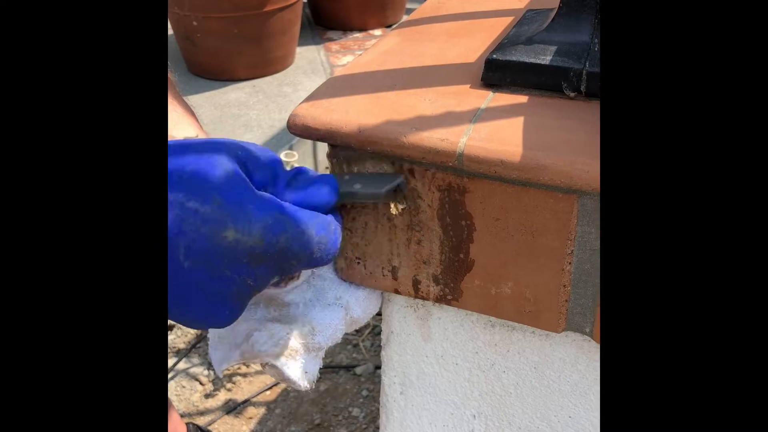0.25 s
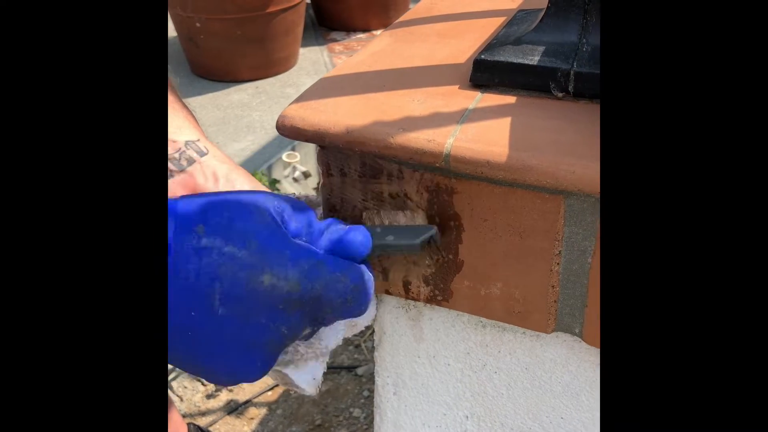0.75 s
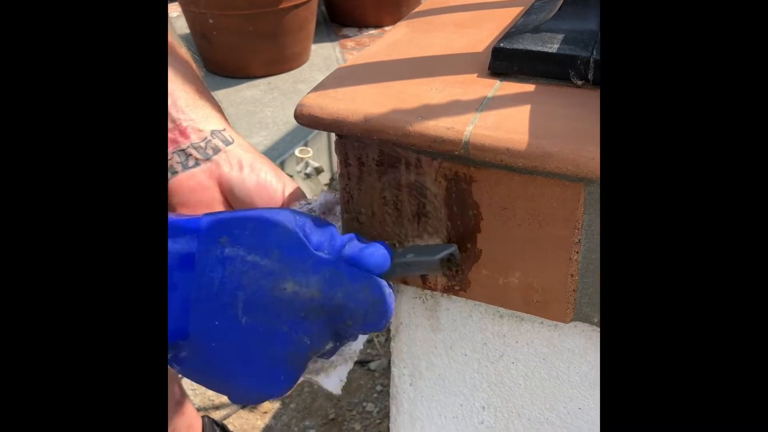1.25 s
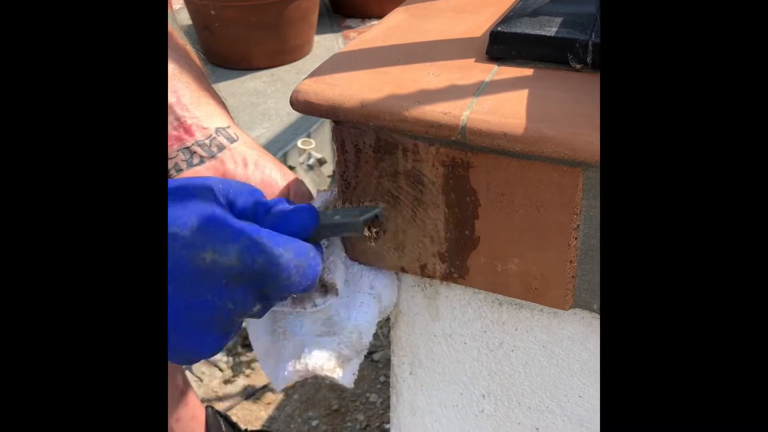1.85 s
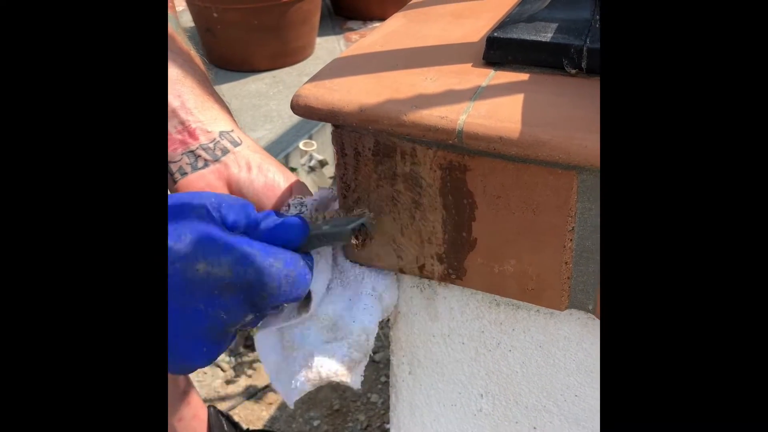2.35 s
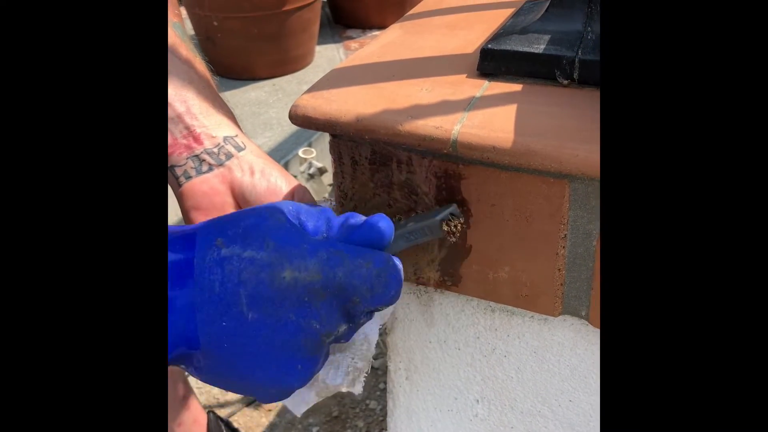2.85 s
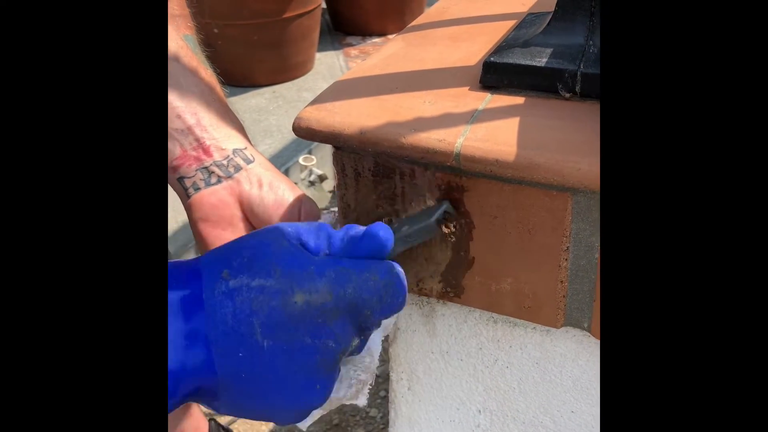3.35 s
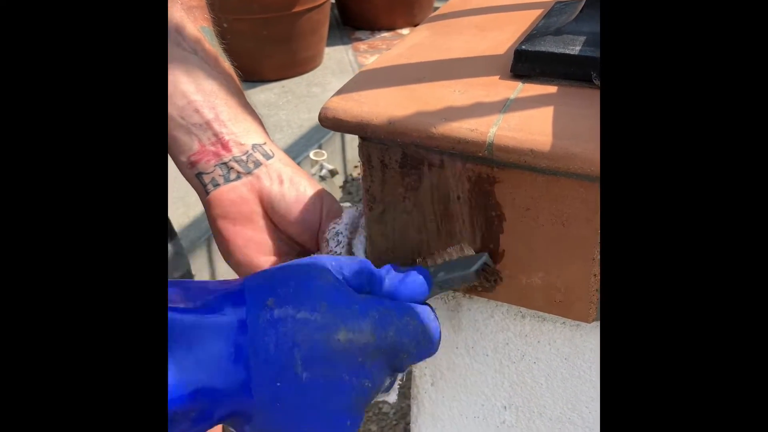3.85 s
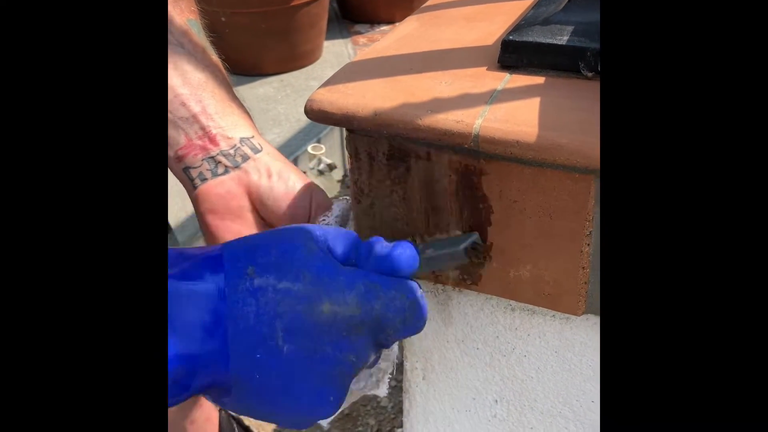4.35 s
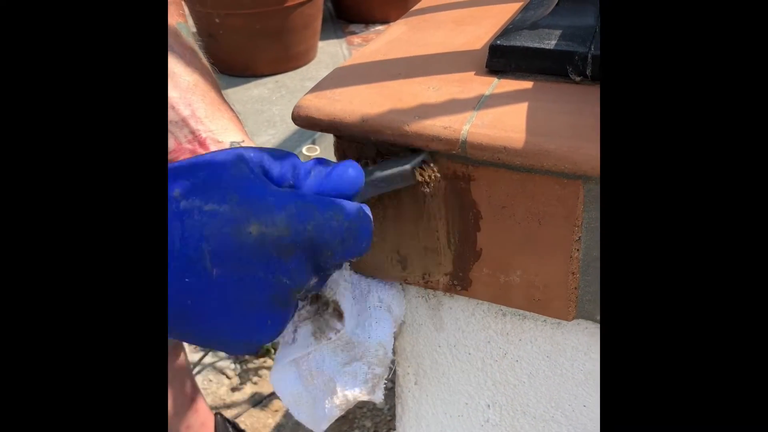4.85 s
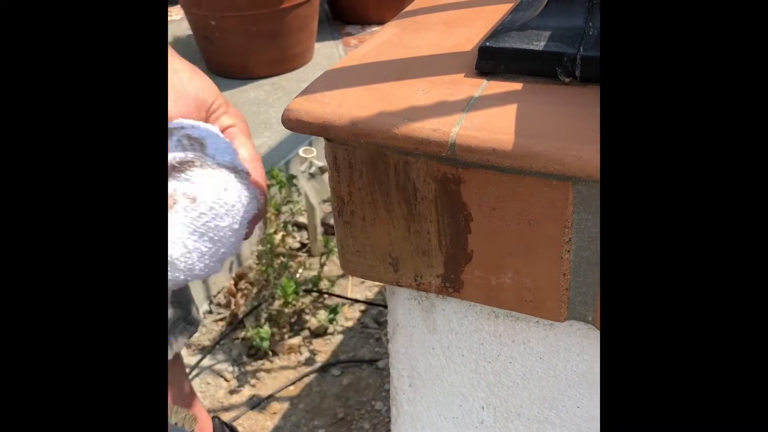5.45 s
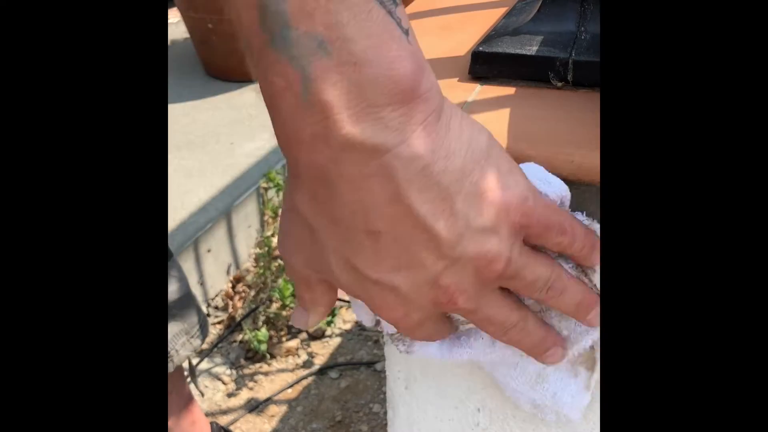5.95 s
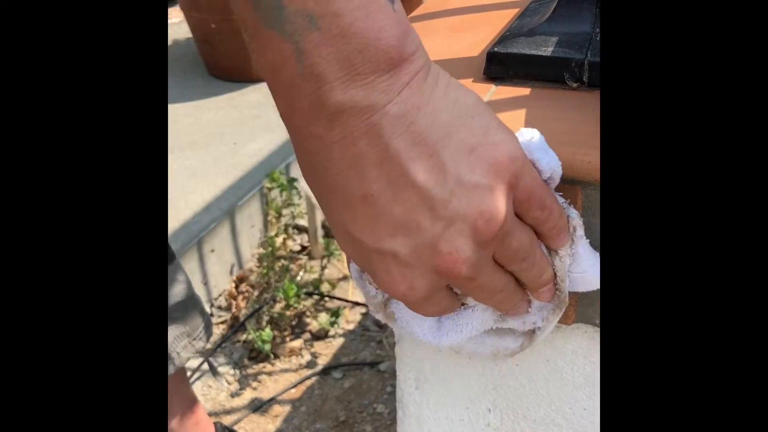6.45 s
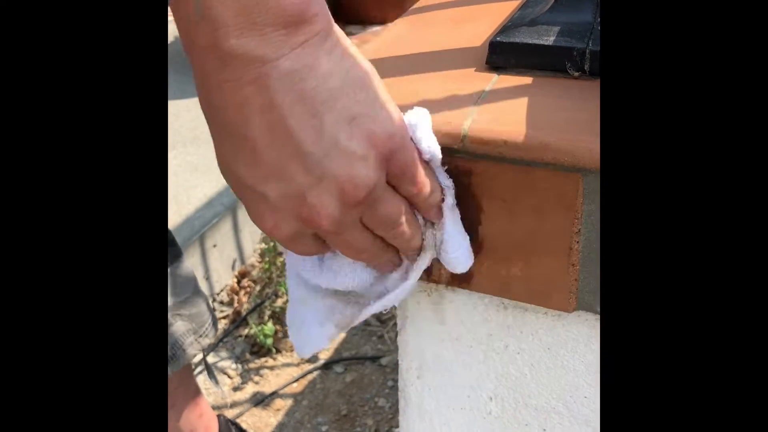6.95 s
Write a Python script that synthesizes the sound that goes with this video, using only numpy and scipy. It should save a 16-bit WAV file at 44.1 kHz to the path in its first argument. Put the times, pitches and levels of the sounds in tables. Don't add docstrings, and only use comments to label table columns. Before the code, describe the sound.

A close, dry outdoor scene, almost centred and without echo. From 0 to 1 second a small wire brush makes quick, light back-and-forth scratches on rough clay tile, about one every tenth of a second, bright and gritty. From 1 to 3 seconds it moves in small circles, seven rasping swells roughly a quarter second apart, gradually slackening, with a few dull little taps. From 3 to 5.4 seconds the strokes turn harder and faster-feeling, with short skids and woody-hard knocks, the loudest near 4.5 and 5.2. Then scrubbing stops; cloth rustles very faintly. From 6.1 to 7.2 seconds a rag drags over damp tile in six short, smoother, duller wipes, the strongest near 6.9. Throughout, a light breeze thumps the microphone in low irregular puffs, heaviest around 2 and 4 seconds, above faint distant traffic and a wavering low motor hum.

```python
import sys
import numpy as np
from scipy import signal
from scipy.fft import rfft, irfft, next_fast_len
from scipy.io import wavfile

SR = 44100
rng = np.random.default_rng(int(sys.argv[2]) if len(sys.argv) > 2 else 0)


def generate_wav(sig):
    pcm = np.round(np.clip(np.atleast_2d(sig).T, -1, 1) * 32767).astype(np.int16)
    wavfile.write(sys.argv[1], SR, pcm)


def how_loud(loudness_db):
    steps = np.asarray(loudness_db, float) / 20
    return 10 ** steps


N = 317123
MIC_TOP_HZ = 15740

# (frequency [Hz], density [dB per Hz])
BRISTLE_COLOUR = [(410, -28), (700, -18), (2250, -6.5), (3040, -2.5), (4480, -3), (5040, 0), (7940, -0.5),
                  (9280, -0.5), (12800, -4.5), (15600, -3.5)]
# (frequency [Hz], width [Hz], level [dB])
TILE_RIDGES = [(2770, 196, 1), (3280, 105, 0.5), (4750, 83, -0.5), (4630, 69, -1.5), (6020, 85, 1),
               (7720, 390, 2.5), (9580, 560, -1.5), (12700, 900, 2.5)]
# (turn time [s], level at turn [dB], level up to speed [dB], speed-up [s])
LIGHT_STROKES = [
    (0.0, -33.5, -33.5, .02),
    (.058, -49.4, -34, .034),
    (.163, -51, -32, .085),
    (.285, -50, -33.8, .039),
    (.392, -50.5, -31.5, .082),
    (.504, -48, -34, .018),
    (.622, -56, -31.6, .054),
    (.746, -53, -35, .03),
    (.862, -59, -32.5, .043),
]
HARD_STROKES = [(3.052, -49, -36.8, .04), (3.172, -40, -32.6, .06), (3.298, -58.5, -35, .033),
                (3.399, -51, -32, .042), (3.522, -58, -33, .037), (3.625, -50, -29.5, .045),
                (3.737, -55, -33.8, .04), (3.842, -47, -32, .038), (3.963, -59, -32, .046),
                (4.06, -53, -30.5, .054), (4.192, -54, -31.5, .049), (4.291, -55, -30, .048),
                (4.412, -57, -33.3, .045), (4.517, -55.5, -29.5, .051), (4.644, -57, -32.5, .034),
                (4.743, -45, -29.5, .059), (4.865, -55, -30.3, .05), (4.959, -43, -32, .046),
                (5.085, -60, -31.5, .044), (5.187, -39.5, -37, .12)]
# (time [s], level [dB])
LIGHT_END, HARD_END = (.986, -47.8), (5.381, -70.5)
# (gain along it [dB], braking [s], tile-body share [dB], tile-edge share [dB], wire-tip share [dB])
LIGHT_PUSH, LIGHT_PULL = (0.3, .028, -8, 0.6, -0.8), (-1.2, .023, 2.5, 1.5, -4.5)
HARD_PUSH, HARD_PULL = (3.6, .014, 3.5, 2.6, 0.2), (-4.4, .023, 0.6, -0.2, -1.8)
# (peak time [s], peak level [dB], swell [s], ease [s])
LEANS = [
    (1.165, -31, .12, .085),
    (1.41, -30, .065, .055),
    (1.661, -28.5, .061, .05),
    (1.907, -30.5, .06, .056),
    (2.14, -31, .055, .1),
    (2.385, -31.8, .06, .075),
    (2.67, -31.5, .045, .064),
]
# (tile-body share [dB], tile-edge share [dB], wire-tip share [dB])
LEANING, COASTING = (2.2, 1.6, -0.8), (-2.0, 3.8, -2.0)
CIRCLE_DB, SLACK_BEFORE_DB, SLACK_AFTER_DB = -37.2, 1.6, 1.2
TAKE_UP_S, TIRING_DB_PER_S = .025, .45
# (time [s], level [dB], length [s])
SPRING_BACK = [
    (3.185, -39, .016),
    (3.409, -43, .014),
    (3.633, -43, .011),
    (3.851, -41.5, .01),
    (4.751, -37, .018),
    (4.964, -36, .024),
]
SPRING_SAG_DB = 4.2
# (time [s], peak level [dB], frequency [Hz])
TAPS = [
    (1.9540, -38, 750),
    (2.078, -38, 1200),
    (2.939, -38, 1700),
    (4.0495, -29, 1500),
    (4.281, -31, 1800),
    (4.5036, -21, 2600),
    (4.668, -36, 1700),
    (4.9528, -27, 2200),
    (5.1754, -18, 2400),
]
# (start time [s], length [s], speed-up [s], level [dB], dull rub share [dB])
WIPES = [
    (6.095, .285, .068, -38.5, -2.2),
    (6.4, .174, .06, -42, 1.2),
    (6.613, .134, .029, -35.5, 0.8),
    (6.777, .12, .024, -39.5, 6),
    (6.917, .13, .057, -33.5, -2),
    (7.087, .1, .02, -41, 4),
]
# (frequency [Hz], density [dB per Hz])
RAG_COLOUR = [(260, -12), (450, -8), (514, -15), (578, -5.5), (824, -4.5), (998, -1), (2310, -8),
              (3600, -4.5), (6800, -0.5), (11900, -6.5), (15300, -12)]
# (time [s], level [dB])
RUSTLE = [
    (5.3, -66),
    (5.39, -60.5),
    (5.58, -61),
    (5.75, -66),
    (5.82, -60),
    (5.93, -58),
    (6.0, -60.5),
    (6.38, -60.5),
    (7.19, -62),
]
# (frequency [Hz], density [dB per Hz])
CLOTH_COLOUR = [(1180, -42), (2000, 5.5), (2120, -10), (2330, 0.5), (3190, -3.5), (5280, -5), (15300, -22)]
# (time [s], level [dB])
BREEZE = [(0.0, -49), (.45, -54), (.62, -46.5), (.9, -53), (1.08, -48.5), (1.3, -57), (2.0, -45.5),
          (2.55, -52), (2.8, -61), (3.0, -48), (3.26, -46), (3.4, -62), (4.1, -50), (4.3, -60),
          (4.9, -54.5), (5.6, -61), (6.65, -59), (7.0, -47)]
# (peak time [s], peak
# level [dB], frequency [Hz])
EDDIES = [(.037, -35.5, 168), (.24, -35, 180), (.442, -33, 86.5), (.683, -36, 102), (1.431, -35.5, 196),
          (1.634, -35, 140), (1.847, -27, 218), (1.959, -32, 230), (2.015, -27, 167), (2.034, -32, 151),
          (2.104, -29, 120), (2.179, -34, 228), (2.226, -27.5, 198), (2.472, -36, 150), (2.702, -35.5, 188),
          (3.066, -32, 190), (3.284, -36, 146), (3.609, -36.9, 113), (3.869, -35, 100), (3.902, -32, 131),
          (4.003, -23, 244), (5.354, -36, 174), (5.865, -40, 108), (6.133, -37.5, 207), (6.707, -35.5, 205),
          (6.861, -37.5, 158), (6.981, -33.5, 231), (7.006, -31.5, 343), (7.05, -35.5, 180),
          (7.148, -37, 135),
          (.098, -43, 163), (.19, -37.5, 100), (.362, -38, 130), (.527, -38.3, 181), (.57, -36, 106),
            (.78, -38, 153), (.962, -41.5, 284), (.991, -42, 75), (1.341, -43, 113), (1.669, -39, 114),
            (1.742, -36.5, 96), (1.977, -33, 148), (2.253, -36, 132), (2.29, -36, 127), (2.345, -36, 171),
            (2.962, -39, 232), (3.186, -40, 118), (3.232, -42, 91), (3.415, -43, 133), (3.469, -42.5, 106),
            (4.028, -38, 96), (4.468, -44, 164), (4.707, -41, 265), (4.724, -40.5, 94), (4.112, -40, 120),
            (5.027, -42, 140), (2.59, -43, 210), (5.142, -40, 95), (6.598, -43, 183), (7.026, -39, 306)]
# (frequency [Hz], density [dB per Hz])
TRAFFIC_COLOUR = [(150, -32), (250, -11), (506, -6), (588, -5), (1010, -4.5), (1150, -2.5), (1400, -8.5),
                  (1510, -4.5), (9000, -53), (11700, -53), (19800, -120)]
# (time [s], tyre roar level [dB])
STREET = [(0.0, -56), (0.58, -58), (0.96, -54.5), (1.34, -58.5), (2.0, -57.5), (2.2, -60.5), (3.92, -60.5),
          (4.08, -57.5), (4.83, -59.5), (5.71, -57.5), (5.99, -55), (6.23, -58.5), (7.19, -59)]
HUM_HZ, HUM_WIDTH_HZ, HUM_DB = 151.5, 4.0, -63
# (time [s], low edge [Hz], high edge [Hz], level [dB])
SIDE_HISS = [
    (1.88, 9350, 12500, -44),
    (1.88, 13800, 15300, -48),
    (2.905, 4250, 5000, -50),
    (2.905, 10300, 12200, -49),
    (5.293, 11000, 12200, -50),
    (6.223, 4300, 5800, -50),
    (6.223, 13100, 14500, -50),
]


def brush():
    corners, grip = hand()
    speed, = in_time(np.transpose([corners[:, 0], how_loud(corners[:, 1] / 2)]))
    level_db = 40 * np.log10(speed)
    body_db, edge_db, tip_db = in_time(grip)
    body_db += 0.13 * (level_db + 29)
    tip_db += .05 * (level_db + 33)
    scrapes = grains(per_s=20000, spread_db=2.0)
    snaps = plucked(grains(per_s=5500, spread_db=2.4), cycles=60)
    tufts = how_loud(0.46 * drift(55))
    catches = rms_one((scrapes + how_loud(-4) * snaps) * tufts)
    shares = [(body_db, 0, 2000), (edge_db, 2000, 4200), (tip_db, 8500, SR)]
    out = how_loud(level_db) * coloured(catches, BRISTLE_COLOUR, 1.32, shares, TILE_RIDGES)
    for s, peak_db, hz in TAPS:
        knock, _ = chirp(hz, glide=3.0, hold=.6)
        handle, _ = chirp(.62 * hz, glide=4.0, hold=1.1)
        add(out, int(s * SR), how_loud(peak_db) * knock)
        add(out, int((s + .0008) * SR), how_loud(peak_db - 12) * handle)
    return out


def hand():
    resume = HARD_STROKES[0][0] - TAKE_UP_S
    level = [(HARD_END[0] + .02, -90), (resume, CIRCLE_DB - TIRING_DB_PER_S * (resume - LIGHT_END[0]))]
    grip = [(LIGHT_END[0] + TAKE_UP_S, *COASTING), (resume, *HARD_PULL[2:])]
    runs = [(LIGHT_STROKES, LIGHT_END, (LIGHT_PUSH, LIGHT_PULL)), (HARD_STROKES, HARD_END, (HARD_PUSH, HARD_PULL))]
    for strokes, end, ways in runs:
        level.append(end)
        stops = [row[0] for row in strokes[1:]] + [end[0]]
        for k, ((s, turn_db, db, rise), stop) in enumerate(zip(strokes, stops)):
            gain_db, brake, *shares = ways[k % 2]
            brake_from = max(stop - brake, s + rise + 1e-4)
            level += [(s, turn_db), (s + rise, db), (brake_from, db + gain_db)]
            grip.append(((s + stop) / 2, *shares))
    for s, db, length in SPRING_BACK:
        level += [(s, db), (s + length, db - SPRING_SAG_DB)]
    for s, db, swell, ease in LEANS:
        tired_db = TIRING_DB_PER_S * (s - LIGHT_END[0])
        coast_db = CIRCLE_DB - tired_db
        level += [(s - swell - TAKE_UP_S, coast_db),
                  (s - swell, CIRCLE_DB - SLACK_BEFORE_DB - 2 * tired_db),
                  (s, db),
                  (s + ease, CIRCLE_DB - SLACK_AFTER_DB - 6.0 * tired_db),
                  (s + ease + TAKE_UP_S, coast_db)]
        grip += [(s, *LEANING), (s + ease + 2 * TAKE_UP_S, *COASTING)]
    return np.array(sorted(level)), sorted(grip)


def plucked(clicks, cycles):
    out, dealt = np.zeros(N), rng.integers(0, 28, N)
    tips_hz = np.geomspace(2700, 14500, 28) * how_loud(rng.normal(0, .15, 28))
    for k, hz in enumerate(tips_hz):
        r, w = how_loud(-60 * hz / (cycles * SR)), 2 * np.pi * hz / SR
        struck = clicks * (dealt == k) + 1e-18
        out += hz ** 0.97 * signal.lfilter([np.sin(w)], [1, -2 * r * np.cos(w), r * r], struck)
    return rms_one(out)


def rag():
    start, length, rise, wipe_db, dull_db = np.transpose(WIPES)
    brake = .92 * length ** 2
    middle = start + length / 2
    knots = np.transpose([start, start + rise, start + length - brake, start + length]).ravel()
    still_db = np.full(len(start), -66.)
    end_db = wipe_db + 0.2 - .5 * dull_db
    levels = np.transpose([still_db, wipe_db, end_db, still_db]).ravel()
    level_db, = in_time(np.transpose([knots, levels]))
    top_db, = in_time(np.transpose([middle, wipe_db]))
    touching = level_db > still_db[0]
    pressed_db = 1.8 - .5 * (wipe_db - wipe_db.mean())
    rub_db, hiss_db = in_time(np.transpose([middle, dull_db, pressed_db]))
    hiss_db += .1 * (level_db - top_db)
    drag = rng.standard_normal(N) * how_loud(0.64 * drift(40))
    shares = [(rub_db, 0, 2500), (hiss_db, 9000, SR)]
    wipe = touching * how_loud(level_db) * coloured(drag, RAG_COLOUR, 1.2, shares, first=6 * SR)
    rustle_db, = in_time(RUSTLE)
    crisp_db = -0.6 + .6 * (rustle_db - rustle_db.mean())
    crackle = grains(per_s=9000, spread_db=2.5)
    rustle = coloured(crackle, CLOTH_COLOUR, 1.8, [(crisp_db, 7000, SR)], first=5 * SR)
    return wipe + how_loud(rustle_db) * rustle


def breeze():
    gust_db, = in_time(BREEZE)
    rumble_db = gust_db + 0.5
    flutter_db = -59 + gust_db - gust_db.mean()
    lumps = how_loud(3.8 * drift(16))
    rumble = band_pass(rng.standard_normal(N), 48, 125, order=2) * lumps
    flutter = band_pass(rng.standard_normal(N), 130, 290, order=2) * lumps * how_loud(3.0 * drift(24))
    out = how_loud(rumble_db) * rms_one(rumble) + how_loud(flutter_db) * rms_one(flutter)
    for s, peak_db, hz in EDDIES:
        swing, top = chirp(hz, glide=1.49, hold=0.526)
        add(out, max(int(s * SR) - top, 0), rng.choice([-1, 1]) * how_loud(peak_db + 1.4) * swing)
    return out


def chirp(hz, glide, hold):
    cycles = np.arange(int(6 * SR / hz)) * hz / SR
    puff = cycles ** 1.44 * np.exp(-cycles / hold)
    swing = np.sin(2 * np.pi * 1.8 * glide * (1 - np.exp(-cycles / glide)))
    return swing * puff / puff.max(), np.argmax(puff)


def street():
    r, w = np.exp(-np.pi * HUM_WIDTH_HZ / SR), 2 * np.pi * HUM_HZ / SR
    hum = signal.lfilter([1, 0, -1], [1, -2 * r * np.cos(w), r * r], rng.standard_normal(N))
    street_db, = in_time(STREET)
    drone_db = -.6 * (street_db + 54)
    traffic = coloured(rng.standard_normal(N), TRAFFIC_COLOUR, 2.15, [(drone_db, 0, 600)])
    return how_loud(street_db + 1.5) * traffic + how_loud(HUM_DB) * rms_one(hum)


def coloured(x, spectrum, patchy_db, shelves=(), ridges=(), first=0):
    size = next_fast_len(N - first)
    bins = np.maximum(np.arange(size // 2 + 1) * SR / size, 1)
    hz, level_db = np.transpose(spectrum)
    colour_db = np.interp(np.log(bins), np.log(hz), level_db)
    for ridge_hz, width, ridge_db in ridges:
        colour_db += ridge_db * np.exp(-.5 * ((bins - ridge_hz) / width) ** 2)
    shaped = rfft(x[first:], size) * how_loud(colour_db) * (bins < MIC_TOP_HZ)
    shaped *= np.sqrt((N - first) / np.mean(np.abs(shaped) ** 2))
    out = np.zeros(N)
    for centre in hz[0] * 2 ** np.arange(0, np.log2(22000 / hz[0]), .5):
        window = np.clip(1 - 2 * np.abs(np.log2(bins / centre)), 0, 1)
        band = irfft(shaped * window, size)[:N - first]
        gain_db = patchy_db * drift(10) + sum(curve for curve, low, high in shelves if low < centre < high)
        out[first:] += band * how_loud(gain_db)[first:]
    return out


def grains(per_s, spread_db):
    sizes = how_loud(spread_db * np.minimum(rng.exponential(1, N), 4)) * rng.choice([-1, 1], N)
    return rms_one(sizes * (rng.random(N) < per_s / SR))


def drift(rate):
    r = np.exp(-80 * np.pi * rate / SR)
    slow = signal.lfilter([1], [1, -2 * r, r * r], rng.standard_normal(N // 40 + 2002))[2000:]
    return np.interp(np.arange(N) / 40, np.arange(len(slow)), rms_one(slow))


def in_time(rows):
    s, *columns = np.transpose(rows)
    return [np.interp(np.arange(N) / SR, s, c) for c in columns]


def band_pass(x, low_hz, high_hz, order):
    return signal.sosfilt(signal.butter(order, [low_hz, high_hz], "band", fs=SR, output="sos"), x)


def rms_one(x):
    return x / np.sqrt(np.mean(x ** 2) + 1e-20)


def add(out, at, piece):
    out[at:at + len(piece)] += piece[:N - at]


def scene():
    return np.tile(brush() + rag() + breeze() + street(), (2, 1))


def band_limit(x):
    return signal.sosfilt(signal.butter(12, 16600, fs=SR, output="sos"), x)


def record(dry):
    apart, fade = np.zeros(N), np.hanning(2048)
    for s, low_hz, high_hz, level_db in SIDE_HISS:
        hiss = band_pass(rng.standard_normal(len(fade)), low_hz, high_hz, order=6)
        add(apart, int(s * SR) - len(fade) // 2, how_loud(level_db) * rms_one(hiss) * fade)
    dry = signal.sosfilt(signal.butter(2, 38, "high", fs=SR, output="sos"), dry)
    return band_limit(dry + apart * [[1], [-1]])


dry = scene()
out = record(dry)
generate_wav(out)
```